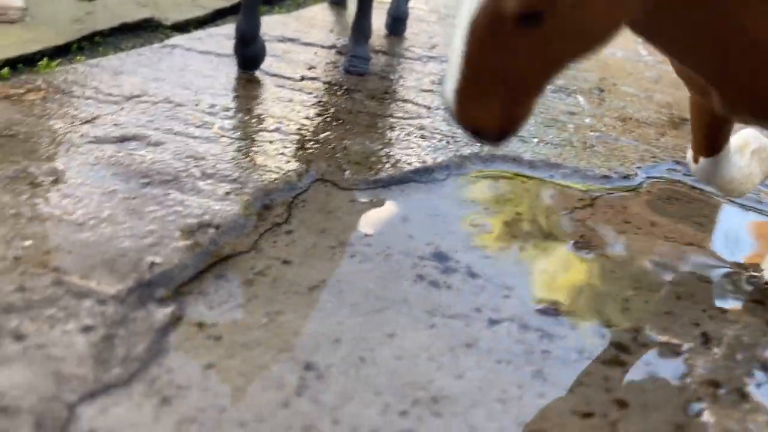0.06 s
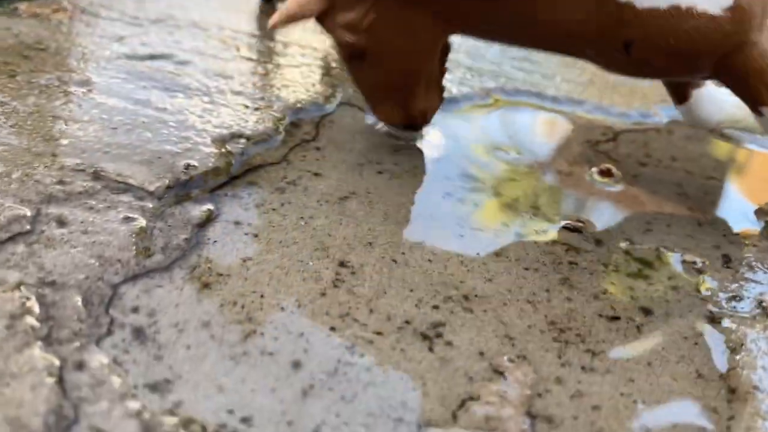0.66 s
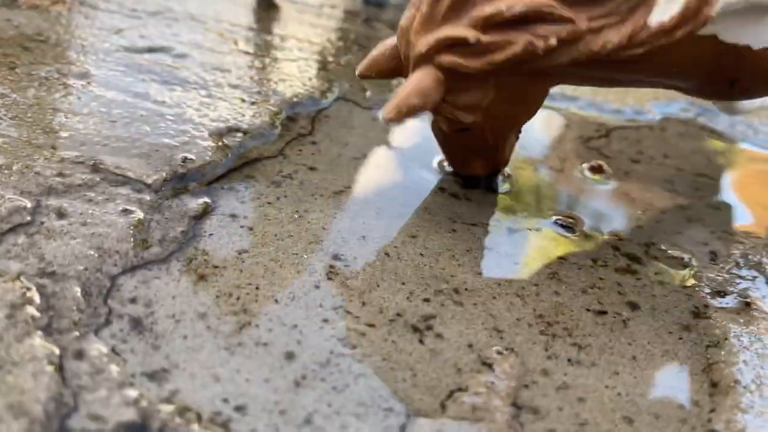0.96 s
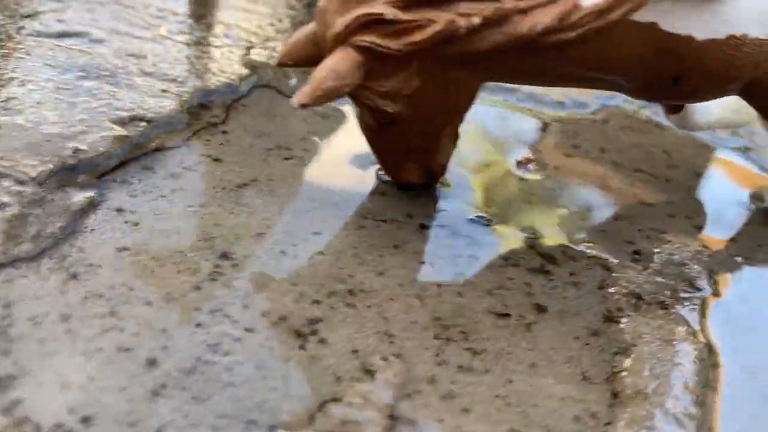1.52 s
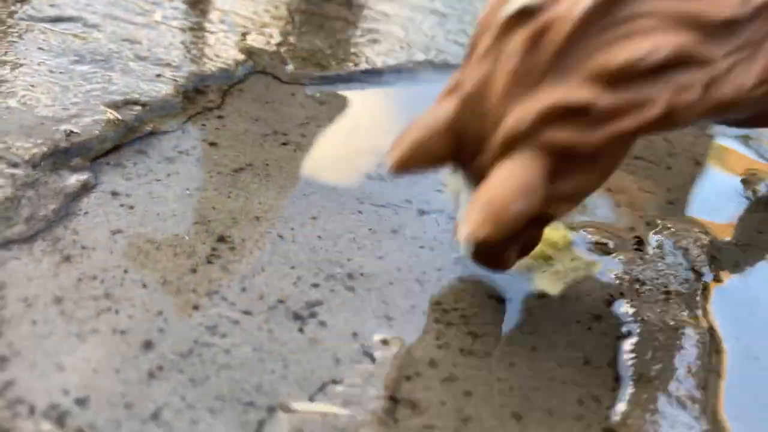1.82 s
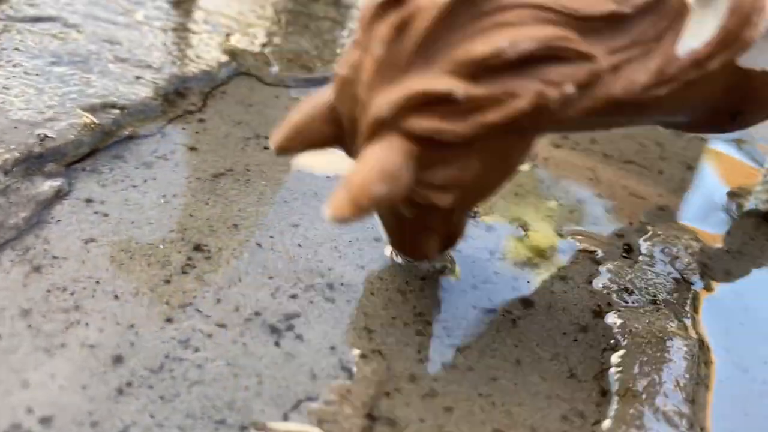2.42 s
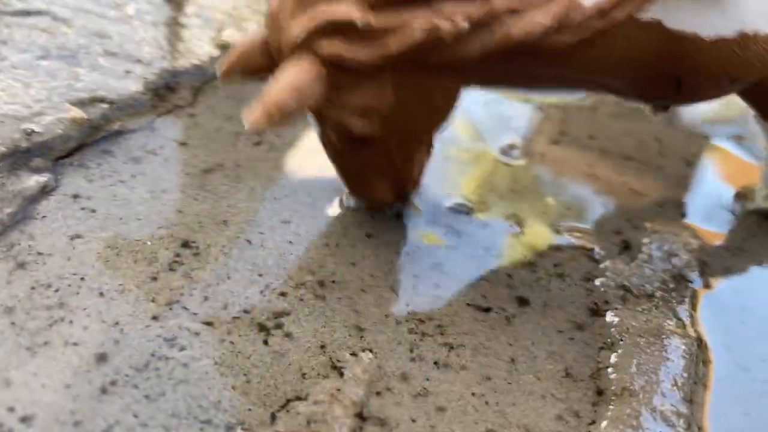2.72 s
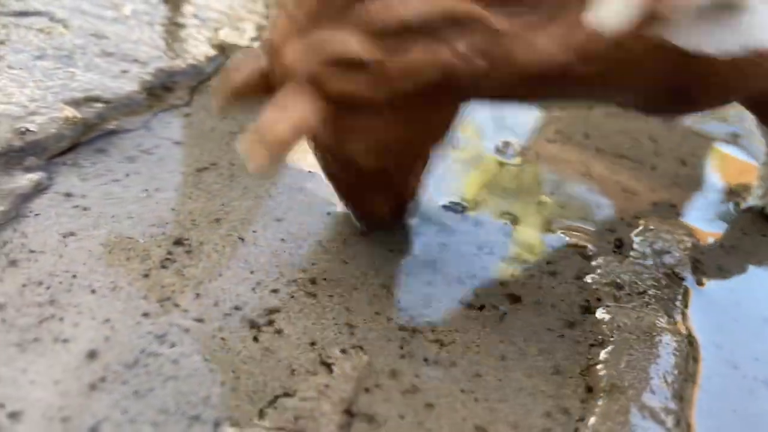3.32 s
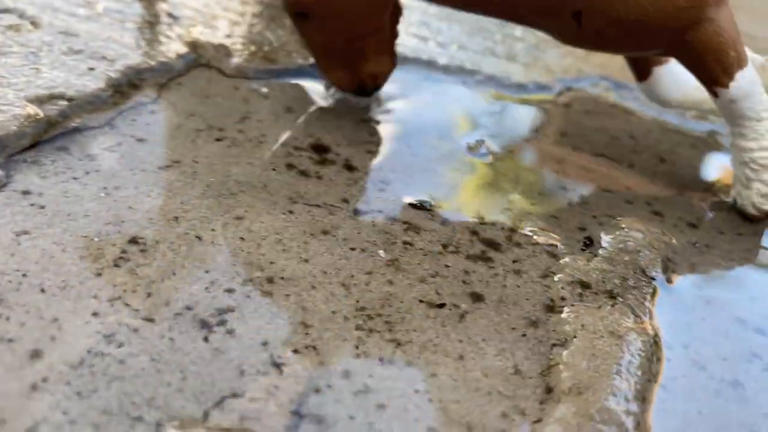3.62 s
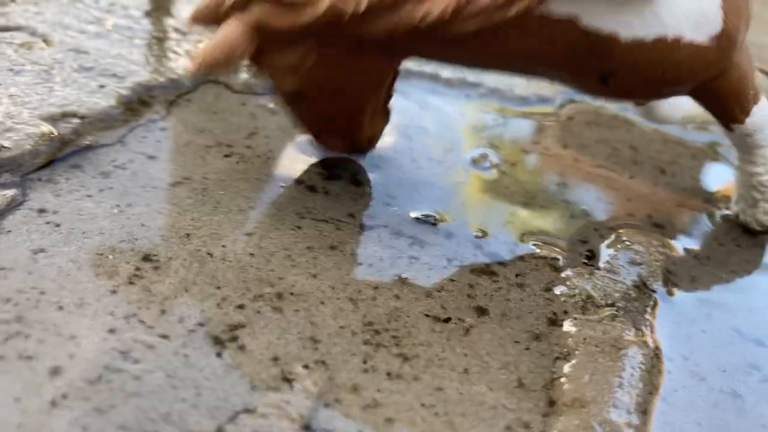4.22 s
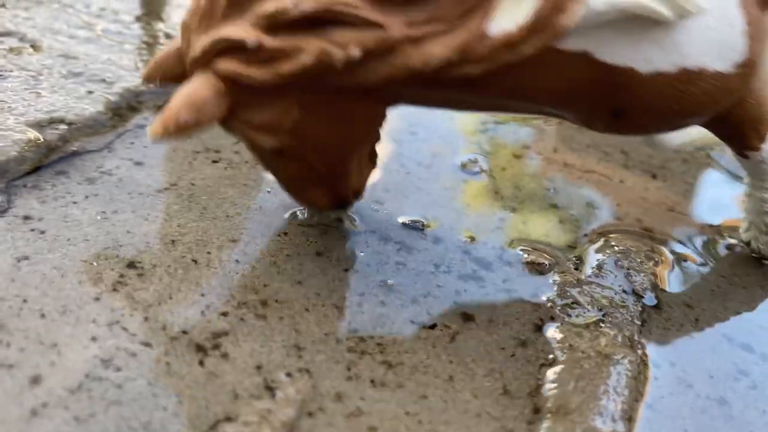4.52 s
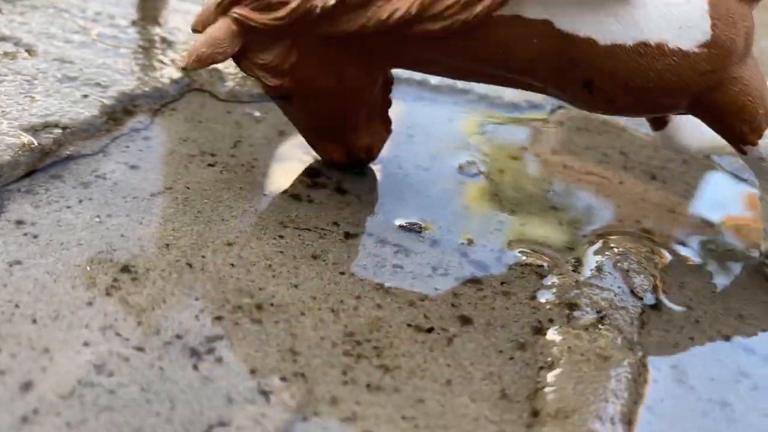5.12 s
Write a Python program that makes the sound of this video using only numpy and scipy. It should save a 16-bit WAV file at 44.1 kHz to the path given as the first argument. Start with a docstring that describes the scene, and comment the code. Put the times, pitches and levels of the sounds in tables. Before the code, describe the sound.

A plastic toy horse is walked over wet paving, close to a hand-held microphone outdoors. Wind rumbles over a quiet hiss of air, and a very faint far whistle fades within the first half second. The toy scrapes softly and crunches grit, then lands with a sharp hollow knock at 0.7 seconds. Lighter, uneven taps and short scrapes follow, each dry and quickly damped. From about 2.2 to 2.7 seconds a deep gust buffets the microphone, the loudest moment, with a gritty knock inside it. The bass then drops away, leaving a thin flutter. A tap with a tiny wet smack comes at 3.3 seconds and a firm knock at 3.9, followed by softer taps and grit crackles. A brief puff of wind and a few thuds arrive around 4.6 seconds, and a last strong hollow knock lands at about 5.1.

```python
"""A plastic toy horse is walked over wet paving, close to a hand-held microphone outdoors.
Each blow rings its damped body; it scrapes in short strokes, crunches grit and parts films of water.
Wind buffets the microphone: a deep rumble peaks in one gust, then the bass drops away and leaves a
thin flutter. Quiet air lies underneath, with a faint far whistle at the start."""
import sys
import numpy as np
from scipy import signal
from scipy.fft import rfft, irfft
from scipy.io import wavfile
from scipy.ndimage import uniform_filter1d

SR = 44100
rng = np.random.default_rng(int(sys.argv[2]) if len(sys.argv) > 2 else 0)


def transcribe(u):
    """Save the signal u as a 16-bit wav file named by the first command-line argument.

    u: samples, shape (n,) or (channels, n), limited to [-1, 1]; the rate is SR.
    q: integer samples, one column per channel.
    """
    v = np.clip(np.atleast_2d(u).T, -1, 1)
    q = np.round(v * 32767).astype(np.int16)
    wavfile.write(sys.argv[1], SR, q)


N = 227556
TIME, HZ = np.arange(N) / SR, np.fft.rfftfreq(N, 1 / SR)

# wind between puffs (time [s], rumble [dB], flutter [dB], rush [dB])
WIND_LEVELS = [(0, -44, -61.5, -74), (0.52, -40, -54.5, -67.5), (1.0, -41.5, -64, -74),
               (1.45, -47.5, -65.5, -73.5), (2.0, -43.5, -55.5, -67.5), (2.25, -38, -63, -73.5),
               (2.38, -34.5, -50, -68.5), (2.67, -33, -42, -70.5), (2.77, -55, -50.5, -70.5),
               (3.15, -93, -61, -73), (3.72, -100, -55, -70.5), (3.86, -100, -74.5, -76),
               (3.93, -50, -43.5, -61), (4.2, -64, -51, -64), (4.54, -52, -48.5, -70),
               (4.59, -27.5, -38.5, -51), (4.76, -68, -51, -64.5), (5.05, -100, -62, -69)]
# puffs of rumble (start [s], length [s], level [dB])
PUFFS = [(0.587, 0.31, -34), (0.881, 0.1, -33), (1.063, 0.064, -32), (1.176, 0.21, -34), (1.451, 0.21, -39),
         (1.67, 0.13, -37.5), (1.837, 0.37, -32), (2.247, 0.33, -14), (2.512, 0.2, -18),
         (4.561, 0.048, -30.5)]
# noise spectra (frequency [Hz], level [dB])
RUMBLE_SPECTRUM = [(15, -29.5), (30, -9.5), (45, -0.5), (62, 1), (82, 1), (125, -9.5), (180, -15.5),
                   (300, -20), (600, -79), (2000, -130)]
FLUTTER_SPECTRUM = [(70, -41), (130, -8), (190, -6.5), (280, 2), (400, -5.5), (600, -26.5), (1200, -74),
                    (2500, -100.5), (8000, -120)]
RUSH_SPECTRUM = [(150, -73), (350, -2.5), (600, 4.5), (1050, -5), (1500, -30), (2500, -29.5), (6000, -83),
                 (14000, -80)]
AIR_SPECTRUM = [(100, -34), (500, 23), (1200, 28.5), (2400, 6.5), (4200, 8.5), (6000, 4.5), (10500, -10),
                (13000, -13), (16000, -3)]
SCRAPE_SPECTRUM = [(300, -23), (900, 6), (2000, -2.5), (3800, -5.5), (6300, -13), (8500, -5), (10500, -7),
                   (12500, -13.5), (14500, -29), (16000, -72)]
GRIT_SPECTRUM = [(300, -15), (1200, 1), (3000, 0.5), (5000, -1.5), (7000, -1.5), (9000, 6.5), (11000, 3.5),
                 (12500, -2), (14500, -11), (16000, -13)]
# far whistle (time [s], pitch [Hz], level [dB])
WHISTLE_CURVE = [(0, 677, -67), (.06, 723, -70.5), (.14, 737, -70), (.24, 722, -73.5), (0.329, 682, -66),
                 (.4, 670, -69), (.46, 674, -98)]
# toy sliding on stone (start [s], length [s], level [dB])
SLIDES = [(0.0, 0.89, -79.5), (0.05, 0.25, -71), (0.394, 0.032, -66.5), (0.468, 0.097, -66),
          (0.745, 0.036, -69), (1.048, 0.08, -80.5), (1.485, 0.02, -82), (1.557, 0.023, -70.5),
          (1.87, 0.93, -78), (1.956, 0.043, -64), (2.2, 0.037, -73.5), (2.29, 0.13, -75),
          (2.589, 0.078, -69.5), (3.948, 0.08, -69), (4.295, 0.025, -71), (4.566, 0.083, -72),
          (4.69, 0.56, -96)]
# loudest grains cracking (time [s], level [dB], decay [s])
CRACKS = [(0.0747, -53.5, 0.0058), (0.408, -53, 0.0028), (0.5038, -43, 0.0031), (0.565, -47.5, 0.01),
          (0.585, -32.5, 0.0019), (0.7752, -33.5, 0.0053), (0.7882, -35.5, 0.0024), (0.805, -38, 0.0021),
          (0.815, -39, 0.0053), (1.118, -54, 0.0076), (1.594, -35, 0.00096), (1.996, -34.5, 0.0065),
          (2.0328, -39.5, 0.0023), (2.6153, -30.5, 0.0039), (2.621, -30.5, 0.0028), (3.0542, -44, 0.0023),
          (3.4186, -52, 0.0024), (3.9114, -49, 0.0037), (4.036, -38, 0.0021), (4.0555, -38, 0.0025),
          (4.3131, -43.5, 0.011), (4.3397, -52, 0.0039), (5.1245, -48, 0.01)]
# narrow treble resonances and notches laid on scrape and grit (centre [Hz], width [Hz], gain [dB])
TREBLE_BANDS = [(1445, 43, 10.5), (3940, 500, 2.5), (4440, 140, 4.5), (4920, 170, 5), (6670, 110, 6.5),
                (7740, 110, -8), (9910, 83, -3), (10980, 1400, 2.5)]
# strongest eddies (time [s], level [dB], pitch [Hz])
EDDIES = [(0.446, -37.5, 220), (2.094, -28.5, 130), (2.317, -25, 84), (2.359, -12, 119), (2.387, -23, 194),
          (2.408, -15, 123.4), (2.437, -12.5, 88), (2.501, -31, 99), (2.601, -13.5, 136),
          (2.708, -28.5, 200), (2.857, -41.5, 350), (2.966, -35, 300), (3.282, -38, 270),
          (3.56, -36.5, 283), (3.639, -40.5, 344), (3.746, -40.5, 344), (3.989, -30, 304),
          (4.087, -36.5, 370), (4.108, -34, 390), (4.126, -36, 414), (4.159, -42, 404), (4.215, -39, 317),
          (4.597, -25.5, 346), (4.658, -34, 364), (4.851, -34.5, 384), (4.945, -35, 388)]
# toy set down (time [s], hollow ring [dB], boom and thud [dB], clack [dB], crushed grit [dB])
BLOWS = [(0.448, -62, -47.5, -65, -62), (0.596, -48, -46.5, -78, -30.5), (0.741, -19, -31, -35.5, -43),
         (0.755, -39, -29, -53, -40.5), (0.832, -41, -36.5, -61, -45), (1.088, -52, -43.5, -60.5, -50),
         (1.487, -36, -31, -48, -39), (1.617, -47.5, -42, -60, -44.5), (1.872, -43.5, -32.5, -62, -45.5),
         (1.997, -42.5, -39, -46, -28), (2.194, -43.5, -40.5, -59, -42.5),
         (2.577, -31.5, -30.5, -39.5, -25.5), (2.587, -37, -35, -55, -60), (2.71, -53.5, -37.5, -68, -41.5),
         (3.048, -44.5, -37, -57, -51), (3.328, -33, -39, -48.5, -33), (3.339, -38, -41, -51, -33.5),
         (3.904, -19, -26, -38.5, -36.5), (3.986, -39.5, -31, -68, -50), (4.09, -48, -30, -74, -76),
         (4.213, -54, -36.5, -83, -81), (4.254, -33, -32.5, -48.5, -55), (4.31, -50.5, -33, -53, -34.5),
         (4.409, -56, -39.5, -62, -41), (4.568, -53, -27, -50, -40), (4.576, -33, -41, -57, -38.5),
         (4.589, -36, -23.5, -75, -60), (4.854, -57, -35.5, -75, -81), (5.131, -15.5, -23, -31, -41)]
# toy's modes: one boom, two hollow, five clack (nominal pitch [Hz], level [dB], t60 [s])
TOY_MODES = [(497.6, 0, 0.025), (934, -1.5, 0.015), (1105, 3, 0.012), (1538, 2, 0.016),
             (1890, -31.5, 0.0044), (2400, -9, 0.016), (3130, -0.5, 0.0037), (4060, -5.5, 0.0038)]
# puddle smacks (time [s], level [dB], starting pitch [Hz])
WET_TICKS = [(1.1693, -47.5, 2080), (1.963, -50.5, 2150), (2.313, -50, 1540), (3.327, -36.5, 2190),
             (4.2928, -48, 2220)]
# phase between microphone ports (frequency [Hz], left lead [rad])
PORT_LEAD = [(0, -1.5), (310, 2), (510, 2), (850, 0.91), (1150, 1.35), (1320, 4.5), (1460, 4), (2240, 7),
             (3000, 8), (5200, 7.5), (6650, 7.5), (8050, 3.5), (10400, 0.44), (13100, -2.5), (16000, -6.5)]
# balance between ports (frequency [Hz], left minus right [dB])
PORT_TILT = [(100, -4.5), (400, 1.5), (1200, -4.5), (2400, 8), (4500, 6.5), (8100, 1.5), (15000, -1.5)]
# bass roll-off (time [s], corner [Hz])
BASS_CORNER = [(0, 22), (2.2, 28.6), (2.33, 56.6), (2.69, 43), (2.78, 151), (3.55, 151), (3.8, 260),
               (3.92, 148), (4.08, 133), (4.19, 280), (4.36, 124), (4.545, 190), (4.572, 55.5), (4.65, 63),
               (4.74, 245), (4.86, 173), (5.05, 219)]


def gain(db):
    return 10 ** (np.asarray(db) / 20)


def unit_rms(x):
    return x / np.sqrt(np.mean(x ** 2) + 1e-20)


def unit_peak(x):
    return x / abs(x).max()


def pulse(x):
    """Rise and decay, peaking at 1 for x = 1."""
    return x * np.exp(1 - x)


def per_bin(table):
    """Table value per FFT bin, interpolated in log frequency."""
    hz, value = np.transpose(table)
    return np.interp(np.log(HZ + 1), np.log(hz + 1), value)


def envelope(table, column):
    """A dB column as gain per sample."""
    rows = np.asarray(table)
    return gain(np.interp(TIME, rows[:, 0], rows[:, column]))


def corner_hz(s):
    return np.interp(s, *np.transpose(BASS_CORNER))


def add(mix, s, sound):
    part = mix[max(round(s * SR), 0):][:len(sound)]
    part += sound[:len(part)]


def coloured(x, spectrum):
    return irfft(rfft(x) * gain(per_bin(spectrum)), N)


def wander(cutoff_hz):
    """Slow unit-rms noise."""
    return unit_rms(irfft(rfft(rng.standard_normal(N)) / (1 + (HZ / cutoff_hz) ** 4), N))


def stereo_noise(spectrum, side_db):
    """Noise common to both ports, plus an antiphase part."""
    mid, side = (unit_rms(coloured(white, spectrum)) for white in rng.standard_normal((2, N)))
    return mid + gain(side_db) * np.array([side, -side])


def random_events(per_s):
    """Rows of (time [s], normal draw, normal draw), at roughly the given rate."""
    gap, size, character = rng.standard_normal((200, 3)).T
    s = np.cumsum(np.exp(gap / 2)) / per_s
    return np.column_stack([s, size, character])[s < TIME[-1]]


def gusting():
    """Rumble envelope: puffs swell and sink over the steady wind."""
    power = envelope(WIND_LEVELS, 1) ** 2
    for s, length_s, db in PUFFS:
        arch = abs(np.sin(np.pi * np.clip((TIME - s) / length_s, 0, 1))) ** 0.9
        power += (gain(db) * arch) ** 2
    return np.sqrt(power)


def wind(rumble_db=-5.5, roll_db=2.5, roll_hz=14, lump_db=3.5, lump_hz=31):
    """Turbulence at the ports: rolling rumble, lumpy flutter, softer rush."""
    rumble = stereo_noise(RUMBLE_SPECTRUM, side_db=-12.5)
    rumble /= np.sqrt(uniform_filter1d((rumble ** 2).mean(0), size=2500) + 1e-6)  # even out the level
    rumble *= gain(rumble_db + roll_db * wander(roll_hz))
    lumps_db = lump_db * wander(lump_hz)
    flutter = stereo_noise(FLUTTER_SPECTRUM, side_db=-6.5) * gain(lumps_db)
    rush = stereo_noise(RUSH_SPECTRUM, side_db=4) * gain(0.83 * lumps_db)
    return rumble * gusting() + flutter * envelope(WIND_LEVELS, 2) + rush * envelope(WIND_LEVELS, 3)


def outdoor_air():
    """Steady wide hiss, louder on the left."""
    return stereo_noise(AIR_SPECTRUM, side_db=0) * gain([[2], [-2]])


def whistle(waver=0.02):
    """A thin tone that arches and fades."""
    s, hz, _ = np.transpose(WHISTLE_CURVE)
    pitch_hz = np.interp(TIME, s, hz) * (1 + waver * wander(44))
    tone = np.sqrt(2) * np.sin(2 * np.pi * np.cumsum(pitch_hz) / SR)
    return tone * envelope(WHISTLE_CURVE, 2) * (TIME < s[-1])


def sliding(attack_s=0.022, release_s=0.029, rest_db=-92.5):
    """Contact envelope: each stroke swells, holds and dies away."""
    power = np.full(N, gain(rest_db) ** 2)
    for s, length_s, db in SLIDES:
        attack = np.clip((TIME - s) / attack_s, 0, 1)
        release = np.exp(-np.maximum(TIME - s - length_s, 0) / release_s)
        power += (gain(db) * attack * release) ** 2
    return np.sqrt(power)


def scrape(catches_per_s=900, catch_db=-3.5, shift_db=2.4, uneven_db=1.2):
    """Plastic on wet stone: hiss with tiny catches, its colour shifting as the contact moves."""
    sizes = gain(3.6 * np.minimum(rng.exponential(1, N), 4.5))
    catches = (rng.random(N) < catches_per_s / SR) * rng.choice([-1, 1], N) * sizes
    friction = rng.standard_normal(N) + gain(catch_db) * unit_rms(catches)
    frames = signal.stft(friction, nperseg=256)[2]
    patches = uniform_filter1d(rng.standard_normal(frames.shape), size=4, axis=0)
    patches = unit_rms(uniform_filter1d(patches, size=12, axis=1))
    shifting = signal.istft(frames * gain(shift_db * patches), nperseg=256)[1][:N]
    return unit_rms(coloured(shifting, SCRAPE_SPECTRUM)) * sliding() * gain(uneven_db * wander(60))


def grit(rise_s=0.00079, crush_s=0.002, lead_s=0.0011, tail_db=-30, tail_s=0.0053,
         loose_per_s=30, loose_db=15, spread_db=4):
    """Grains snap with a faint trickle: singly, along strokes, and just before each blow lands."""
    power, t, contact = np.zeros(N), np.arange(3000) / SR, sliding()
    crushed = [(s - lead_s, db, crush_s) for s, *_, db in BLOWS]
    loose = [(s, 20 * np.log10(contact[int(s * SR)]) + loose_db + spread_db * size, crush_s)
             for s, size, _ in random_events(loose_per_s)]
    attack = 1 - np.exp(-(t / rise_s) ** 2)
    trickle = gain(tail_db) * np.exp(-t / tail_s)
    for s, db, decay_s in list(CRACKS) + crushed + loose:
        snap = np.exp(-2 * t / decay_s)
        add(power, s, (gain(db) * attack * (snap + trickle)) ** 2)
    return coloured(np.sqrt(power) * rng.standard_normal(N), GRIT_SPECTRUM)


def treble_colour(x):
    """Narrow treble resonances and notches."""
    bands_db = sum(db / (1 + (2 * (HZ - hz) / width_hz) ** 2) for hz, width_hz, db in TREBLE_BANDS)
    return irfft(rfft(x) * gain(bands_db), N)


def buffets(pop_hz=520, pop_s=0.0018, pop_db=-24, pop_db_per_octave=10,
            small_per_s=14, small_db=8, spread_db=2.5, base_hz=200):
    """Each eddy is a brief pressure swing with a pop as it crosses the port."""
    out, t, flutter = np.zeros(N), np.arange(4000) / SR, envelope(WIND_LEVELS, 2)
    pop = gain(pop_db) * pulse(t / pop_s) * np.sin(2 * np.pi * pop_hz * t)
    eddies = list(EDDIES)
    for s, size, detune in random_events(small_per_s):  # small eddies follow the flutter
        db = 20 * np.log10(flutter[int(s * SR)]) + small_db + spread_db * size
        hz = (base_hz + 0.93 * corner_hz(s)) * np.exp(0.13 * detune)
        eddies.append((s, db, hz))
    for (s, db, hz), phase in zip(eddies, rng.random(256)):
        rise_s = 0.0032 + 0.5 / hz
        swing = pulse((t / rise_s) ** 2) * np.sin(2 * np.pi * (hz * t + phase))
        add(out, s, gain(db) * swing)
        add(out, s + rise_s / 2, gain(db + pop_db_per_octave * np.log2(hz / base_hz)) * pop)
    return out


def knocks(boom_db=3, clack_db=5, chatter_db=-9, chatter_s=0.011, contact_s=0.0004, softening=0.16,
           thud_hz=190, thud_s=0.0071, sag_s=0.052, thud_db_per_octave=-7.5):
    """Blows ring the damped plastic: boom, hollow note, clack. The hand's weight follows as a thud."""
    out, t = np.zeros(N), np.arange(4000) / SR
    mode_hz, mode_db, t60_s = np.transpose(TOY_MODES)[:, :, None]
    thud = pulse(t / thud_s) * np.sin(2 * np.pi * thud_hz * t / (1 + t / sag_s))
    for s, hollow_db, low_db, hard_db, _ in BLOWS:
        hz = mode_hz * rng.uniform(0.781, 1.082, mode_hz.shape)
        modes = gain(mode_db - 60 * t / t60_s) * np.sin(2 * np.pi * hz * t)
        rise_s = contact_s * gain(-softening * hollow_db)  # gentler touch, longer contact
        modes *= 1 - np.exp(-(t / rise_s) ** 2)
        boom, hollow, clack = (unit_peak(group.sum(0)) for group in np.split(modes, [1, 3]))
        # settling on rough stone keeps the lowest mode chattering
        settling = rng.standard_normal(len(t)) * np.exp(-t / chatter_s)
        chatter = unit_peak(signal.fftconvolve(settling, boom)[:len(t)])
        thud_db = thud_db_per_octave * np.log2(corner_hz(s) / corner_hz(0))  # fades with the bass
        low = gain(thud_db) * thud - gain(boom_db) * (boom + gain(chatter_db) * chatter)
        add(out, s, gain(hollow_db) * hollow + gain(low_db) * low + gain(hard_db + clack_db) * clack)
    return out


def smacks(ring_s=0.00022, chirp_per_s=18):
    """A film of water parts with a tiny rising tick."""
    out, t = np.zeros(N), np.arange(600) / SR
    for s, db, hz in WET_TICKS:
        chirp = np.sin(2 * np.pi * hz * t * (1 + chirp_per_s * t))
        add(out, s, gain(db) * pulse(t / ring_s) * chirp)
    return out


def ports(x):
    """Near sound reaches each port with its own phase and level; smooth curves keep the taps dry."""
    lead_rad = uniform_filter1d(per_bin(PORT_LEAD), size=900)
    tilt = gain(uniform_filter1d(per_bin(PORT_TILT), size=900) / 2)
    return irfft(rfft(x) * np.array([tilt, np.exp(-1j * lead_rad) / tilt]), N)


def echoes(x, t60_s=0.18, delay_s=0.002, cutoff_hz=5000):
    """Dull scatter from paving and walls."""
    t = np.arange(SR // 2) / SR
    tail = rng.standard_normal((2, len(t))) * gain(-60 * t / t60_s) * (t > delay_s)
    tail = signal.lfilter(*signal.butter(1, cutoff_hz, fs=SR), tail / np.linalg.norm(tail[0]))
    return signal.fftconvolve(x[None], tail, axes=1)[:, :N]


def thin_bass(x, order=6):
    """Steep high-pass with a moving corner."""
    hz, s, frames = signal.stft(x, SR, nperseg=1024, noverlap=896)
    ratio = (hz[:, None] / corner_hz(s)) ** order
    highpass = ratio / np.sqrt(1 + ratio ** 2)
    return signal.istft(frames * highpass, SR, nperseg=1024, noverlap=896)[1][:, :N]


def scene():
    """Toy near the microphone, wind on the ports, quiet air and a far whistle."""
    toy = gain(3) * knocks() + gain(3.5) * smacks()
    toy += treble_colour(gain(-1.5) * grit() + gain(7) * scrape())
    air = gain(-78) * outdoor_air()
    return ports(toy) + gain(-16.5) * echoes(toy) + wind() + gain(1) * buffets() + air + whistle()


def record(dry):
    """Bass roll-off, then the band limit."""
    edge_hz = 15900
    lowpass = signal.firwin(511, edge_hz, window=("kaiser", 9), fs=SR)
    return signal.oaconvolve(thin_bass(dry), lowpass[None], "same")


dry = scene()
out = record(dry)
transcribe(out)
```